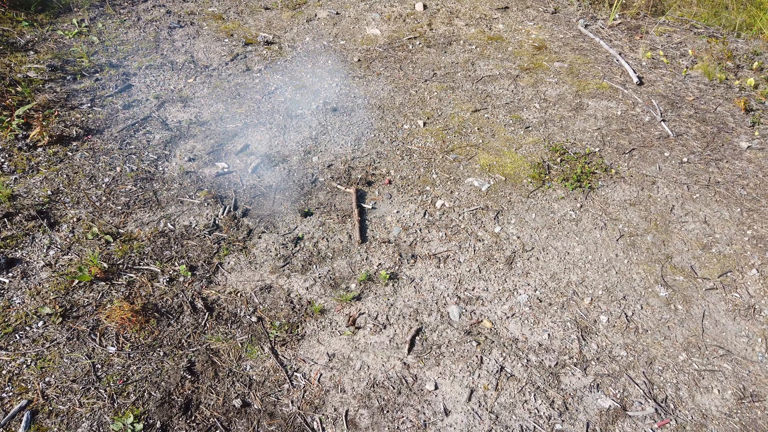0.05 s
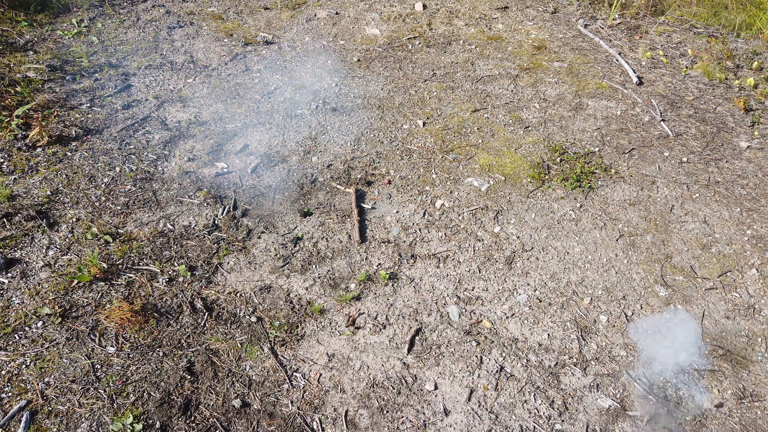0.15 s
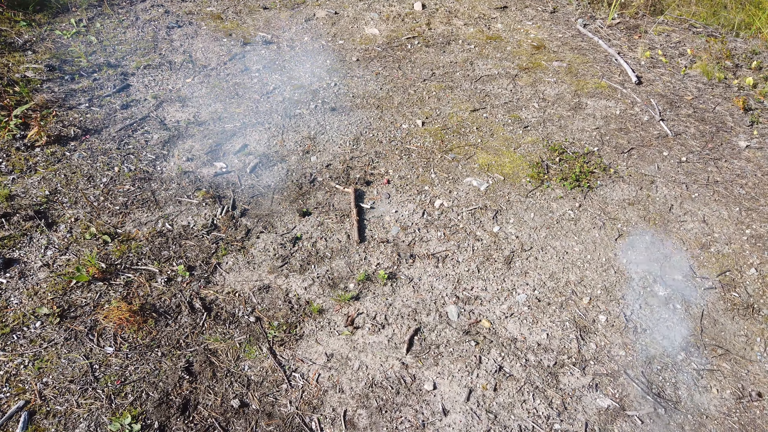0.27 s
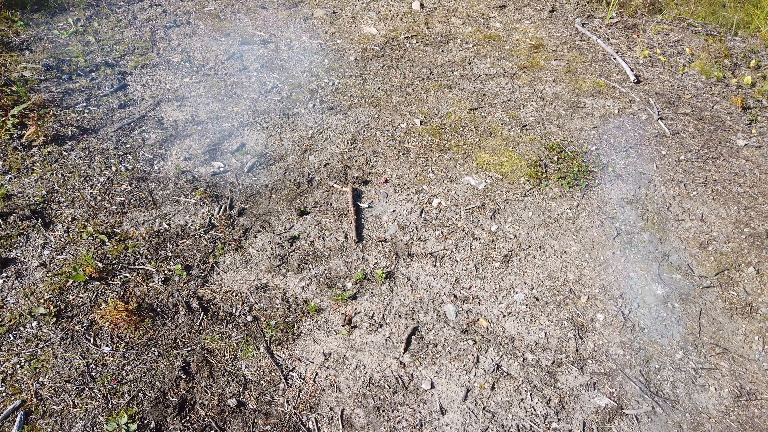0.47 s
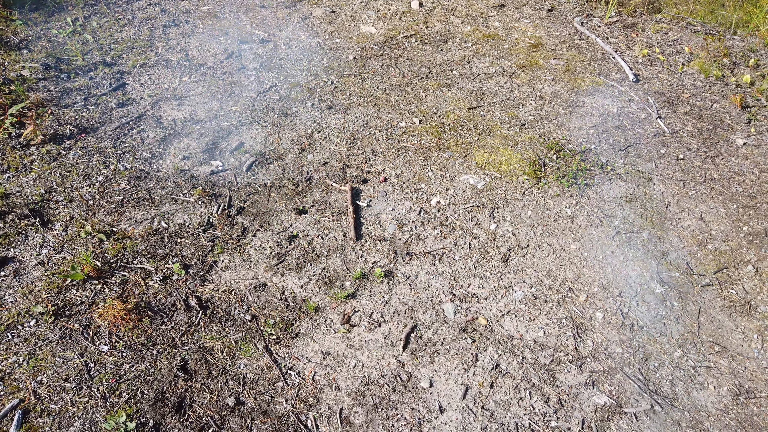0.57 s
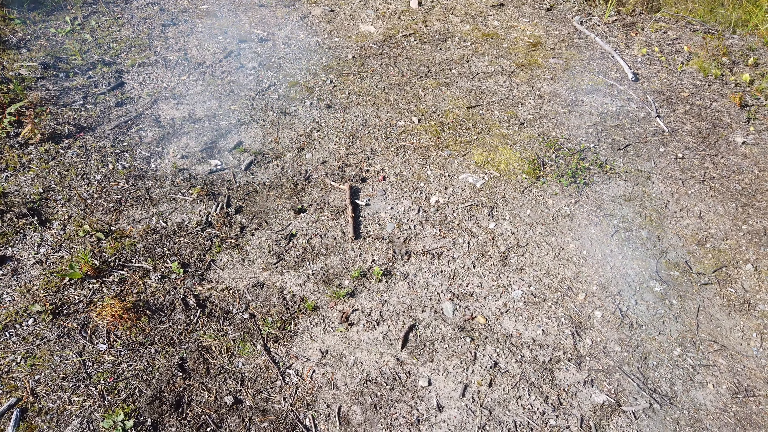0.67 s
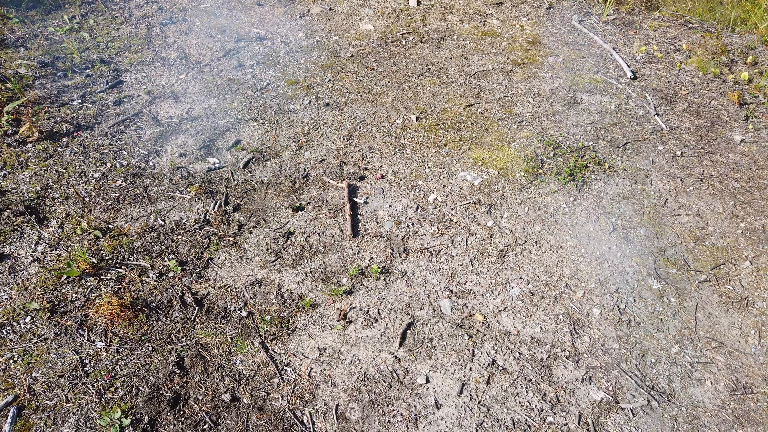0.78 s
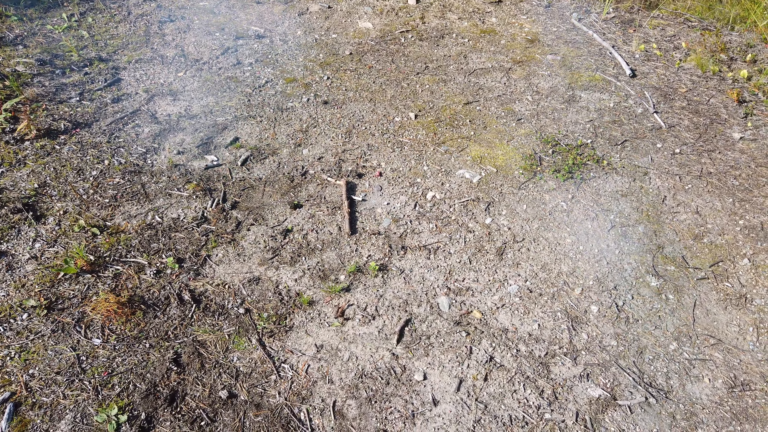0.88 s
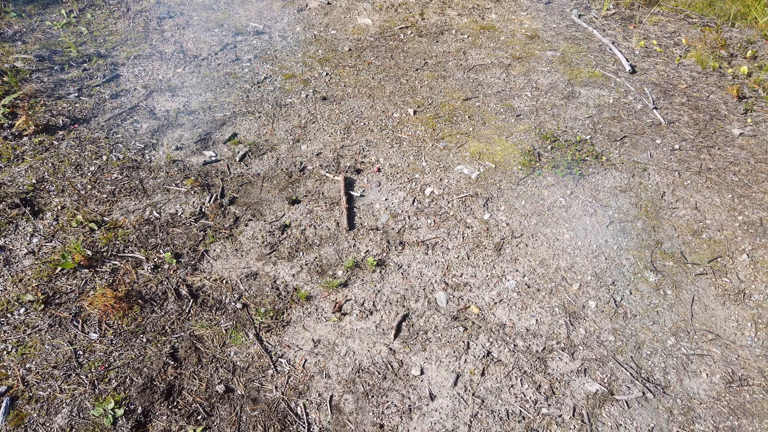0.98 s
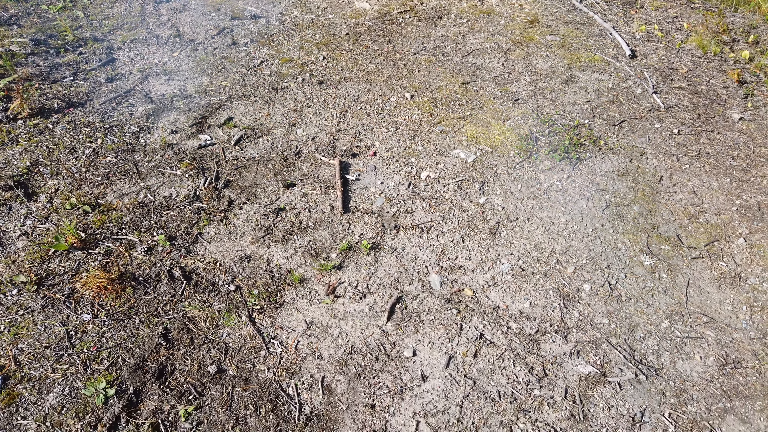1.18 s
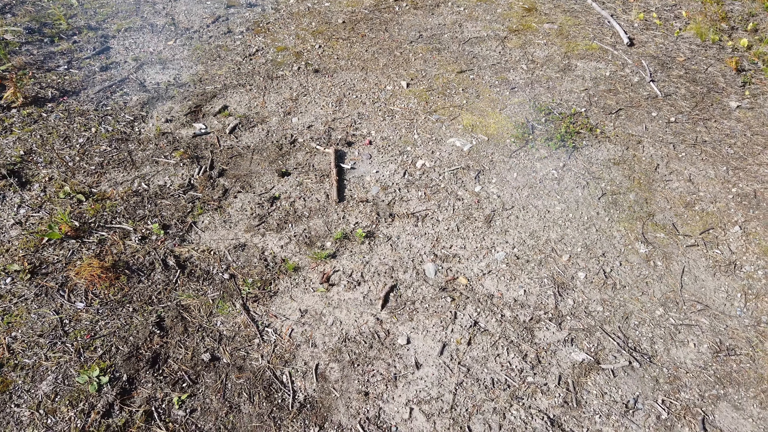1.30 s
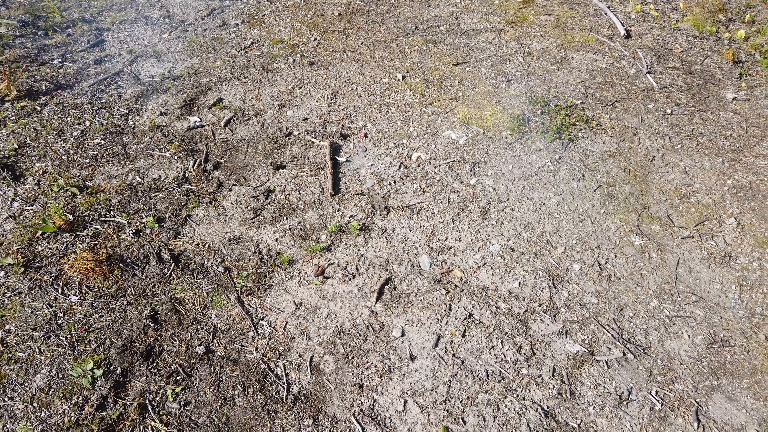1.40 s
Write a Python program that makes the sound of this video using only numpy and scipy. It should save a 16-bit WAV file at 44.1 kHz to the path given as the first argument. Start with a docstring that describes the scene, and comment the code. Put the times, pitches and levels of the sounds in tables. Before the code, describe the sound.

One sharp, loud firecracker burst near the microphones, followed by a fast-fading rolling forest echo.

```python
"""Forest clearing, bare ground: one firecracker bursts close to a stereo microphone pair, to its right. A crack
of noise and ringing slaps are the bang, and a low thump sounds with it; decaying, lumpy noise is the roll of
the trees. A far tree line answers late, over the dying roll of an earlier bang; grit patters down as bright
random ticks. Noise creeps in just ahead of the bang; a low sine hum wavers among rumble and faint hiss of
shaped noise."""
import sys
import numpy as np
from scipy import signal
from scipy.fft import rfft, irfft
from scipy.io import wavfile
from scipy.ndimage import map_coordinates

SR = 44100
rng = np.random.default_rng(int(sys.argv[2]) if len(sys.argv) > 2 else 0)


def generate_wav(signal):
    """Clip the signal to [-1, 1] and save it as 16-bit WAV at the path in sys.argv[1]."""
    frames = np.transpose(np.atleast_2d(signal))
    scaled = np.clip(frames, -1, 1) * 32767
    pcm = np.round(scaled).astype(np.int16)
    wavfile.write(sys.argv[1], SR, pcm)


def volts_from_decibels(level):
    """Turn decibel levels (scalar or array-like) into linear amplitude factors."""
    exponent = np.asarray(level, float) / 20
    return 10 ** exponent


N = 63945
TIME = np.arange(N) / SR  # s
BANG_S = .2201

# colour of the burst's tearing noise: (frequency [Hz], relative level [dB per Hz])
CRACK_COLOUR = [(30, -5), (85, -5), (180, 3), (450, -3), (800, -0.5), (1500, -3), (3000, -1.5),
                (6700, -8.5), (11500, -7.5), (16000, -17.5)]
# likeness of that noise at the two microphones: (frequency [Hz], left-right correlation [-1..1])
CRACK_LIKENESS = [(50, 0.14), (250, .85), (600, 0.71), (1400, .7), (3100, .05), (15000, -0.16)]
# likeness of rumble and hiss in the two channels: (frequency [Hz], left-right correlation [-1..1])
FLOOR_LIKENESS = [(30, 0.8), (90, .96), (250, 0), (1400, .5), (6000, 0.0)]


def unit(x):
    """Scales a signal to rms 1."""
    return x / np.sqrt(np.mean(x ** 2) + 1e-20)


def along(points, hz):
    """Reads a curve of (frequency [Hz], value) points on a log frequency axis."""
    f, v = np.transpose(points)
    return np.interp(np.log(hz + 1), np.log(f + 1), v)


def wobble(rate):
    """A smooth random curve with rate knots a second."""
    knots = rng.standard_normal(int(N * rate / SR) + 4)
    return map_coordinates(knots, [TIME * rate])


def rush(colour, likeness):
    """Stereo noise of rms 1: the balance of mid to side sets how alike left and right are at each frequency."""
    hz = np.fft.rfftfreq(N, 1 / SR)
    turn = np.arccos(np.clip(along(likeness, hz), -1, 1)) / 2
    coloured = rfft(rng.standard_normal((2, N))) * volts_from_decibels(along(colour, hz))
    mid, side = irfft(coloured * [np.cos(turn), np.sin(turn)], N)
    return unit(np.array([mid + side, mid - side]))


def roll(start, db, rise, colour, t60, lumps_db):
    """Scattered sound from many trunks: it swells, comes in lumps, and each frequency dies at its own speed."""
    # likeness of the rolls at the two microphones: (frequency [Hz], left-right correlation [-1..1])
    likeness = [(60, 1), (300, 1), (700, 1), (1400, .88), (2100, 0.93), (3300, -0.068), (6800, -.05)]
    hz, t, z = signal.stft(rush(colour, likeness), SR, nperseg=256)
    decay_s = np.maximum(along(t60, hz), .02)[:, None]
    fading = volts_from_decibels(-60 * np.maximum(t - start, 0) / decay_s)
    scattered = signal.istft(z * fading, SR, nperseg=256)[1][:, :N]
    age = np.maximum(TIME - start, 0)
    swell = 1 - np.exp(-age / max(rise, 1e-4))
    lumps = lumps_db * (wobble(220) + 0.44 * wobble(30))
    return volts_from_decibels(db + lumps) * swell * scattered


def hiss():
    """Faint steady noise with its own colour."""
    # (frequency [Hz], relative level [dB per Hz])
    colour = [(100, -10), (200, -2), (600, -1.5), (1600, -8), (4000, -16), (9000, -26.5), (10500, -47),
              (16000, -57)]
    return volts_from_decibels(-73.5) * rush(colour, FLOOR_LIKENESS)


def rumble():
    """Low noise whose level wanders at random."""
    # (frequency [Hz], relative level [dB per Hz])
    colour = [(7, -20.5), (15, -3.5), (26, 0), (55, -13.5), (80, -17.5), (120, -24.5), (250, -31),
              (550, -60)]
    return volts_from_decibels(-64 + 1.8 * wobble(8.3)) * rush(colour, FLOOR_LIKENESS)


def hum():
    """A low sine that wavers in pitch and level, with a faint octave above it."""
    # course of the fundamental: (time [s], frequency [Hz], rms level [dB])
    course = [(0, 37.02, -62.5), (.1, 36.27, -57), (.18, 34.85, -60.5), (.35, 35.01, -50),
              (.42, 35.9, -52.5), (.53, 35.9, -58), (.75, 35.53, -50.5), (.83, 35.61, -51.5),
              (1.1, 36.05, -47), (1.19, 36.55, -55.5), (1.32, 35.74, -50.5), (1.45, 35.49, -48)]
    s, hz, db = np.transpose(course)
    turn = 2 * np.pi * np.cumsum(np.interp(TIME, s, hz)) / SR
    octave = volts_from_decibels(-24.5) * np.sin(2 * turn)
    return np.sqrt(2) * volts_from_decibels(np.interp(TIME, s, db)) * (np.sin(turn + 1.1) + octave)


def far_tree_line():
    """Late rolls off the distant trees, muffled, and the dying roll of the earlier bang."""
    # the first is from the earlier bang: (start [s], level before swell and decay [dB], rise [s])
    rolls = [(-.08, -51, 0.46), (0.949, -55, 0.07), (1.2, -68, 0.11)]
    # (frequency [Hz], relative level [dB per Hz])
    colour = [(240, -39.5), (450, -18), (800, -5), (1700, 1), (2600, -5.5), (3300, -17.5), (6500, -39.5),
              (11000, -70)]
    # (frequency [Hz], time to fall 60 dB [s])
    decay = [(800, 1), (3000, 1.1)]
    return sum(roll(s, db, rise, colour, decay, lumps_db=0.64) for s, db, rise in rolls)


def deep_wood():
    """The wood behind rolls on: a slow swell that lasts longest in the middle frequencies."""
    # (frequency [Hz], relative level [dB per Hz])
    colour = [(90, -44), (200, -22), (450, -13.5), (800, -6), (1700, -0.5), (2800, -1), (4000, -7),
              (8000, -11), (11500, -23), (13000, -45)]
    # (frequency [Hz], time to fall 60 dB [s])
    decay = [(300, .7), (800, 1.15), (1600, 1.194), (3000, 0.95), (6000, .64), (12000, .45)]
    return roll(BANG_S, -29, 0.14, colour, decay, lumps_db=0.64)


def near_trees():
    """Scatter off the near trees: louder, quick to swell and quick to die."""
    # (frequency [Hz], relative level [dB per Hz])
    colour = [(40, -18), (110, -12.5), (250, -10.5), (500, -6.5), (900, -3), (1700, 1), (2900, -1.5),
              (3700, -12), (7000, -12), (11300, -10), (16000, -20)]
    # (frequency [Hz], time to fall 60 dB [s])
    decay = [(100, .33), (400, .31), (1500, 0.35), (5000, 0.35), (11000, .31), (16000, .2)]
    return roll(BANG_S, -8.5, .028, colour, decay, lumps_db=0.77)


def grit():
    """Falling grit: tiny bright ticks at random moments, in showers that rise fast and die away."""
    # (time of peak [s], level there [dB], rise [s], time to fall 60 dB [s], top frequency [Hz])
    showers = [(.585, -56.5, 0.0098, 0.14, 15800), (.759, -73.5, 0.01, .09, 11700)]
    # (frequency [Hz], relative level [dB per Hz])
    colour = [(5000, -27), (9500, -18), (10600, -4), (15100, -7), (16000, -9)]
    ticks_per_s, spread_db = 2200, 3.5
    struck = rng.random((2, N)) < ticks_per_s / SR
    ticks = struck * volts_from_decibels(spread_db * rng.exponential(size=(2, N))) * rng.choice([-1, 1], (2, N))
    hz = np.fft.rfftfreq(N, 1 / SR)
    bright = rfft(ticks) * volts_from_decibels(along(colour, hz))
    out = np.zeros((2, N))
    for s, db, rise, t60, top_hz in showers:
        patter = unit(irfft(bright / (1 + (hz / top_hz) ** 24), N))
        growth = np.exp(np.minimum(TIME - s, 0) / rise)
        out += volts_from_decibels(db - 60 * np.maximum(TIME - s, 0) / t60) * growth * patter
    return out


def smear():
    """Noise with the colour of the crack creeps in just ahead of the bang and stops at it."""
    # level reached at the bang, one row for each channel, left then right: (level [dB])
    end_level = [
        [-24.5],
        [-22.5],
    ]
    # climb over the whole smear, left then right: (gain [dB])
    climb = [
        [9],
        [26],
    ]
    length_s = .027
    ahead = (BANG_S - TIME) / length_s  # 1 at the start of the smear, 0 at the bang
    edge = np.clip((1 - ahead) * 3, 0, 1) ** 2.9 * (ahead > 0)  # opens over the first third
    level = end_level - np.multiply(climb, np.clip(ahead, 0, 1))
    return volts_from_decibels(level) * edge * rush(CRACK_COLOUR, CRACK_LIKENESS)


def bang():
    """A tearing crack and short ringing slaps off ground and trunks; at the same moment a low 22 Hz thump sets
    in and dies quickly."""
    # blast and single echoes: (time [s], envelope peak [dB], pitch [Hz], length of ring [cycles])
    slaps = [(0.2203, -23, 200.2, 1.2), (.2218, -7, 560, 1.2), (0.2238, -7, 2700, 2.04),
             (0.2288, -8, 1100, 1.3), (.2324, -7, 950, 0.83), (.2357, -11.5, 2000, 1.4),
             (0.2396, -8, 1700, 1.3), (.245, -7.5, 1550, 2), (.2469, -2, 1650, 1.4),
             (0.2688, -14.5, 1900, 1.5), (.2775, -11.5, 2100, 1.5), (0.282, -14.5, 1790, 1.3),
             (.298, -16.5, 2240, 2.18), (.312, -25.5, 1260, 0.91), (1.038, -57, 1670, 14),
             (1.139, -52, 1600, 1.8)]
    left_lag_s, lag_fades_s = 1.3e-4, .008  # burst on the right; later echoes come from ahead
    snap_db, snap_t60_s, snap_loss_db_per_s = -8, .012, 30  # scrap of crack in each slap; long paths lose it
    age = np.maximum(TIME - BANG_S, 0)
    tearing = volts_from_decibels(-9.5 - 60 * age / 0.059) * (age > 0)
    thump = volts_from_decibels(-27.5 - 60 * age / 0.078) * np.sin(2 * np.pi * 22 * age)
    out = thump * np.ones((2, 1))
    for s, db, hz, cycles in slaps:
        lag = [[left_lag_s * np.exp((BANG_S - s) / lag_fades_s)], [0]]
        jitter = rng.normal(0, 2e-5, (2, 1))  # s
        u = np.maximum(TIME - s - lag + jitter, 0) * hz  # age of the slap in cycles
        envelope = np.e * 2 * u / cycles * np.exp(-2 * u / cycles)
        out = out + volts_from_decibels(db) * envelope * np.sin(2 * np.pi * u)
        snap_level = db + snap_db - snap_loss_db_per_s * (s - BANG_S)
        snap = volts_from_decibels(snap_level - 60 * u / hz / snap_t60_s) * (u > 0)
        tearing = np.hypot(tearing, snap)  # noise powers add
    return out + tearing * rush(CRACK_COLOUR, CRACK_LIKENESS)


def scene():
    """The whole mix before band limit and ceiling: background, forest, grit, noise ahead of the bang, bang."""
    background = hiss() + rumble() + hum()
    forest = far_tree_line() + deep_wood() + near_trees()
    return background + forest + grit() + smear() + bang()


def band_limit(x):
    """A steep low-pass at the top of the band."""
    return signal.sosfilt(signal.butter(12, 16470, fs=SR, output="sos"), x)


def record(dry):
    """A steep band limit, then a hard ceiling at full scale, then the last stage."""
    top_hz, ceiling = 15900, 1.0
    hz = np.fft.rfftfreq(N, 1 / SR)
    kept = irfft(rfft(dry) / (1 + (hz / top_hz) ** 200), N)
    return band_limit(np.clip(kept, -ceiling, ceiling))


dry = scene()
out = record(dry)
generate_wav(out)
```